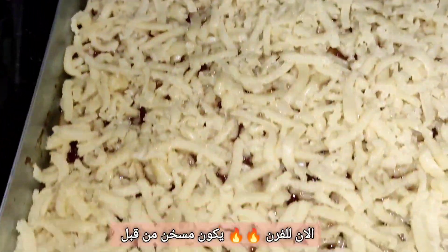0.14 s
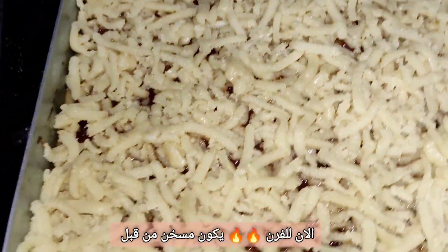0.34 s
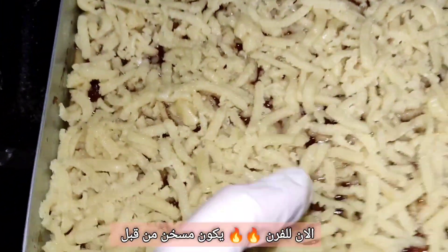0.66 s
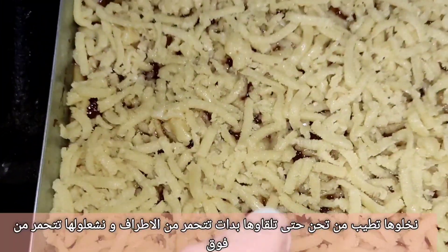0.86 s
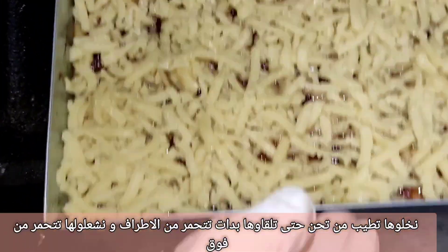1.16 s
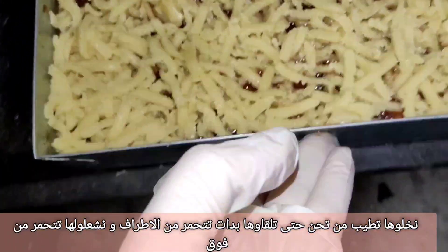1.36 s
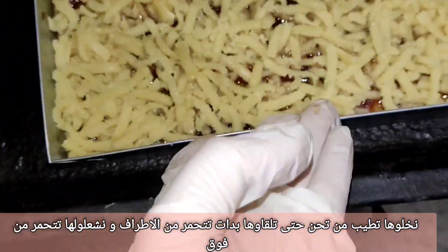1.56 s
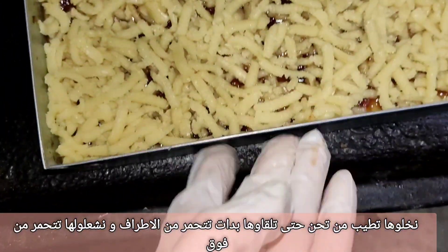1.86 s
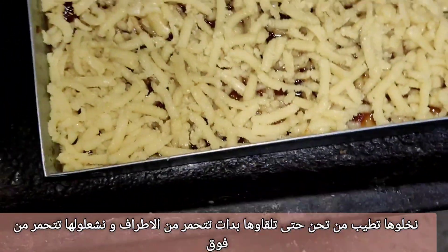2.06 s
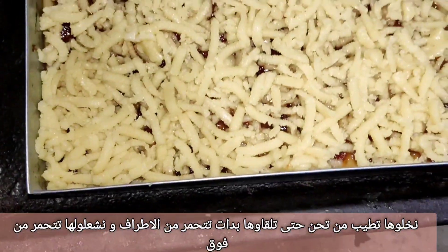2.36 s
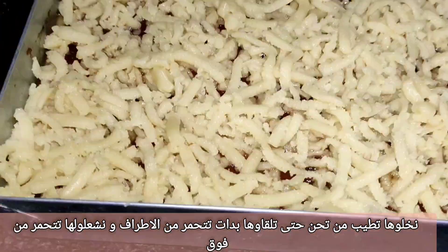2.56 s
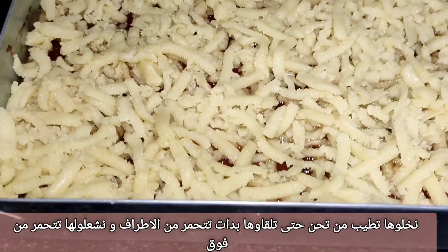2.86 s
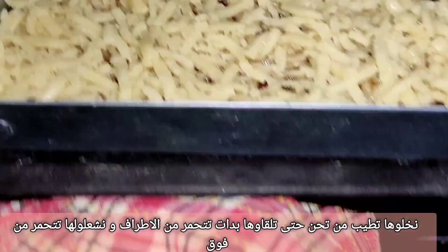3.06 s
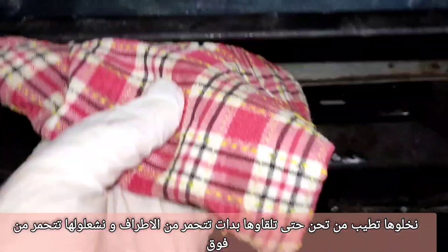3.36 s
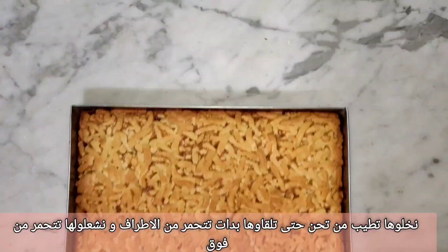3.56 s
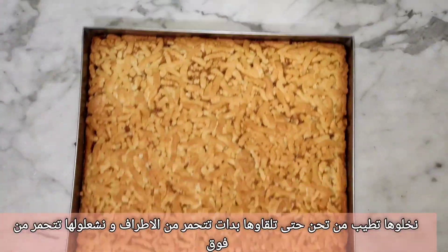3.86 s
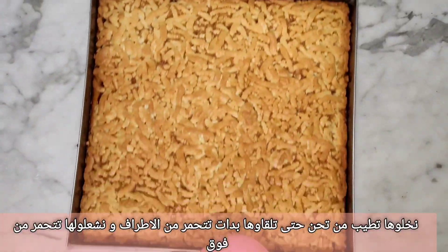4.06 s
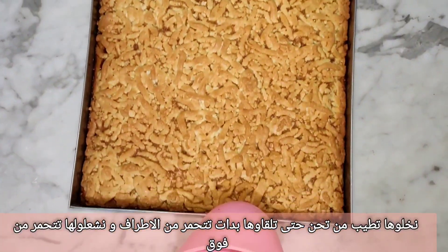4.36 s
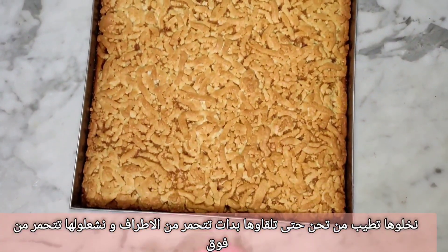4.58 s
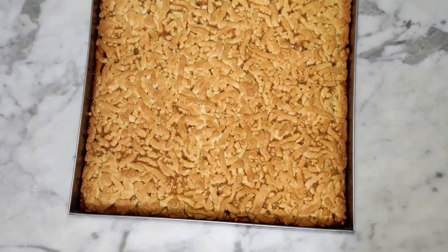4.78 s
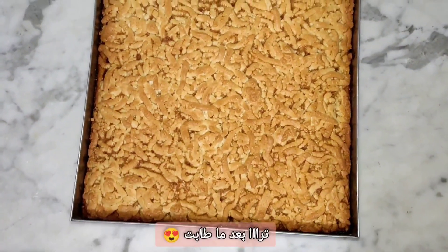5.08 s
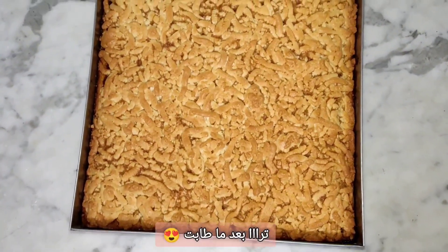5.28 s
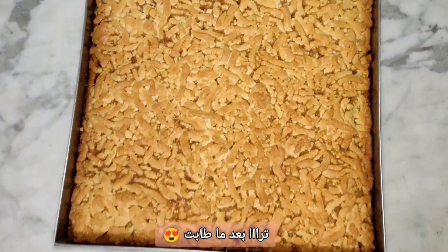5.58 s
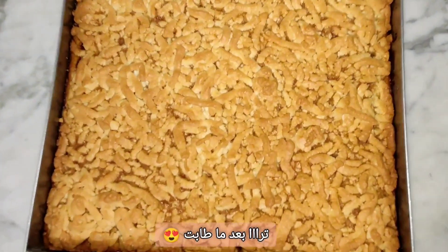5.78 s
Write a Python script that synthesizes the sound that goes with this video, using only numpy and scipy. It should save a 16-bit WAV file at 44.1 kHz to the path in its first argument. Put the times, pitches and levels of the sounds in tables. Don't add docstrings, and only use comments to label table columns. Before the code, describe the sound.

A faint low oven hum and airy noise open the scene. At about 0.27 s a metal baking tray starts grinding along the rack bars with short squeaky ringing and hollow oven resonance. It drops at 0.75-0.8 s with the loudest clanks, bouncing and rattling, then fades by 1.1 s. A second push from 1.13 s scrapes and sings around 700 Hz, with hard knocks near 1.5 s, dying by 1.8 s. Only hum and tiny ticks remain; at 2.58 s the sound drops out briefly and fades back. A light last slide from 2.9 s turns into sharp scrapes and knocks at 3.17-3.3 s. At 3.55 s it cuts to a quiet kitchen with soft mains buzz. The tray rubs gently over stone from 3.6 to 4.45 s, with small bumps near 3.97 s. Sparse clicks follow until 4.8 s, faint far chirps around 5 s, and a thin high whine swells slightly at the end.

```python
import sys
import numpy as np
from scipy import signal
from scipy.fft import rfft, irfft, next_fast_len
from scipy.io import wavfile
from scipy.ndimage import uniform_filter1d

SR = 44100
rng = np.random.default_rng(int(sys.argv[2]) if len(sys.argv) > 2 else 0)


def to_wav(sig):
    pcm = np.clip(np.atleast_2d(sig), -1, 1) * 32767
    pcm = np.round(pcm).astype(np.int16)
    wavfile.write(sys.argv[1], SR, pcm.T)


def convert_level_to_amplitude(level_db):
    exponent = np.asarray(level_db, float) / 20
    return 10 ** exponent


N = 261513
TO_COUNTER_S = 3.552


def evened(x):
    return x / np.sqrt(np.mean(x ** 2) + 1e-20)


def read(points, hz):
    f, value = np.transpose(points)
    return np.interp(np.log(hz + 1), np.log(f + 1), value)


def add(mix, s, sound):
    part = mix[round(s * SR):][:len(sound)]
    part += sound[:len(part)]


def wander(clock, smooth):
    knots = clock[::2000]
    return np.interp(clock, knots, evened(uniform_filter1d(rng.standard_normal(len(knots)), smooth)))


def resonate(x, hz, width):
    turn = np.exp(2j * np.pi * np.cumsum(hz * np.ones(len(x))) / SR)
    r = np.exp(-np.pi * width / SR)
    return 2 * (turn * signal.lfilter([1 - r], [1, -r], x / turn)).real


def split(x, edges_hz):
    lows = [signal.sosfilt(signal.butter(4, hz, fs=SR, output="sos"), x) for hz in edges_hz]
    highs = [signal.sosfilt(signal.butter(4, hz, "high", fs=SR, output="sos"), y)
             for hz, y in zip(edges_hz, lows[1:] + [x])]
    return lows[:1] + highs


def grit(per_s, spread_db, smooth):
    size = convert_level_to_amplitude(spread_db * np.minimum(rng.exponential(1, N), 4))
    slips = size * (rng.random(N) < per_s / SR) * rng.choice([-1., 1.], N)
    return evened(evened(slips) + smooth * rng.standard_normal(N))


def dense_rings(colour, t60s, count, size):
    hz, t, z = signal.stft(rng.standard_normal((count, size)), SR, nperseg=256)
    dying = z * convert_level_to_amplitude(-60 * t / read(t60s, hz)[:, None])
    z = rfft(signal.istft(dying, SR, nperseg=256)[1][:, :size])
    z /= np.sqrt(uniform_filter1d(abs(z) ** 2, size // 200))
    return evened(irfft(z * convert_level_to_amplitude(read(colour, np.fft.rfftfreq(size, 1 / SR)))))


def sliding(drive, rings, dwell_s):
    place, size = np.arange(N) / SR / dwell_s, next_fast_len(N + rings.shape[1])
    away = (place - np.arange(len(rings))[:, None]) % len(rings) - 1
    share = np.cos(np.pi / 2 * np.clip(away, -1, 1))
    rung = irfft((rfft(drive * share, size) * rfft(rings, size)).sum(0), size)[:N]
    return rung / np.linalg.norm(rings[0])


# frequency in Hz, likeness from 0 to 1.
AIR_SAME = [(60, 0.6), (130, 0.81), (290, 0.64), (630, 0.05), (1390, 0.065), (3050, 0.01), (6680, 0.01),
            (14600, 0.022)]


def air(colour, level_db, tones, waver_db, leaning):
    size = next_fast_len(N)
    hz, t = np.fft.rfftfreq(size, 1 / SR), np.arange(size) / SR
    a, b = rfft(rng.standard_normal((2, size)))
    like, right = np.clip(read(AIR_SAME, hz), -1, 1), convert_level_to_amplitude(-read(leaning, hz))
    z = np.array([a, right * (like * a + np.sqrt(1 - like ** 2) * b)])
    z *= convert_level_to_amplitude(read(colour, hz)) / np.sqrt(1 + right ** 2 + 2 * like * right)
    audible = irfft(z.mean(0) * (hz > 60), size)
    noise = irfft(z, size) / np.std(audible) * convert_level_to_amplitude(level_db)
    for f, db in tones:
        drift = wander(t, 4)
        phase = f * t + rng.random() + 0.044 * drift[::-1]
        tone = np.sqrt(2) * convert_level_to_amplitude(db + waver_db * drift) * np.sin(2 * np.pi * phase)
        lean = convert_level_to_amplitude(-read(leaning, f))
        noise += 2 * tone * np.array([[1], [lean]]) / (1 + lean)
    return noise[:, :N]


# frequency in Hz, level in dB per Hz.
OVEN_AIR = [(15, -35), (25, -10), (59, -9.5), (142, -16), (243, -17), (558, -23), (673, -27), (1350, -34),
            (2560, -37), (6370, -45), (10900, -35), (13800, -43), (15000, -60)]
# frequency in Hz, level in dB.
OVEN_HUM = [(48.4, -48.5), (75.4, -63), (247.6, -61.5), (371.4, -74), (689.1, -76.5)]
# frequency in Hz, left minus right in dB.
OVEN_LEAN = [(60, 0), (110, -2), (200, 0.5), (380, 2.5), (690, 4), (1270, 6.5), (2340, 10.5), (4320, 7),
             (7950, 12), (14600, 27)]


def oven_air():
    return air(OVEN_AIR, -54.5, OVEN_HUM, 1.2, OVEN_LEAN)


# frequency in Hz, level in dB, decay time T60 in seconds.
TRAY_MODES = [(106, -13.5, 0.78), (195.6, -2.5, 0.36), (606, -19.5, 1), (685.4, -27, 0.94),
              (810, -10.5, 0.3), (885, -4, 0.23), (1270, -15, 0.094), (1419, -25, 0.19),
              (1623, -18.5, 0.29), (2164, -24.5, 0.42), (2200, -30.5, 0.33), (2730, -24.5, 0.2),
              (2986, -31, 0.2), (3280, -30, 0.82)]
# frequency in Hz, level in dB, decay time T60 in seconds.
OVEN_MODES = [(75.4, -41.5, 0.89), (188, -0.5, 0.15), (228.85, 3.5, 1), (366, -15, 0.74),
              (539, -16.5, 0.48), (721, -34.5, 0.48), (785, -40, 0.32), (940, -24.5, 0.28)]
# frequency in Hz, level in dB per Hz.
METAL = [(29, -50.5), (50, -5.5), (133, -17), (181, 3), (299, -17.5), (483, -11), (570, -17), (674, -12.5),
         (876, -19), (1630, -19), (2690, -13.5), (6060, -27.5), (10500, -16), (14000, -24.5), (15000, -65)]
# frequency in Hz, decay time T60 in seconds.
METAL_T60 = [(60, 0.31), (300, 0.25), (1000, 0.05), (3000, 0.11), (8000, 0.052), (14000, 0.017)]


def metal_rings():
    t = np.arange(8192) / SR
    dense = dense_rings(METAL, METAL_T60, count=4, size=len(t))
    tray_modes, oven_modes = [
        evened(sum(convert_level_to_amplitude(db - 60 * t / t60) * np.sin(2 * np.pi * hz * t) for hz, db, t60 in modes))
        for modes in (TRAY_MODES, OVEN_MODES)]
    return dense, tray_modes, oven_modes


EDGES_HZ = [300, 1100, 6000]
# time in seconds, weight on the bars in dB, sliding speed in dB, pitch of the free sheet in Hz.
FIRST_PUSH = [
    (0.266, -31, -49.5, 947),
    (0.375, -31.5, -50, 964),
    (0.385, -31.5, -56.5, 790),
    (0.534, -33.5, -41.5, 736),
    (0.684, -37.5, -51.5, 770),
    (0.7, -44.5, -40.5, 750),
    (0.74, -36, -57, 755),
]
SET_DOWN = [
    (0.743, -22.5, -37.5, 735),
    (0.762, -20, -39.5, 744),
    (0.775, -19, -34.5, 740),
    (0.839, -27.5, -51.5, 717),
    (1.039, -48.5, -76.5, 734),
    (1.12, -49, -54.5, 745),
]
SECOND_PUSH = [
    (1.13, -42, -54, 750),
    (1.154, -33.5, -46.5, 760),
    (1.288, -27.5, -36.5, 657),
    (1.458, -27, -40, 721),
    (1.51, -20, -31.5, 728),
    (1.562, -32.5, -46, 774),
    (1.708, -48.5, -68.5, 665),
    (1.806, -60.5, -62, 740),
    (1.9, -51.5, -70, 650),
]
LAST_PUSH = [
    (2.8, -80, -70, 701),
    (2.914, -55.5, -42.5, 774),
    (3.164, -55.5, -34, 731),
    (3.174, -42, -33, 728),
    (3.222, -40, -37.5, 755),
    (3.26, -34, -27, 768),
    (3.304, -41.5, -34.5, 690),
    (3.518, -56, -37.5, 753),
    (3.55, -34.5, -37, 771),
]
# oven boom in dB, share of the singing sheet, rack clatter in dB.
COUPLING = [
    (-4.5, 0.29, 1),
    (-6.5, 0.62, -4),
    (-13.5, 0.75, 0.37),
    (-3.5, 0.32, -0.2),
]
FROM_WEIGHT_DB = [-2, 0, -9.5, -37.5]
FROM_SPEED_DB = [-2.5, -22, -7.5, -0.5]
WEIGHT_POWER = [0.76, 0.96, 1.175, 1.3]
RELEASE_DB_PER_S = [110, 300, 400, 600]


def sliding_tray(dense, tray_modes, oven_modes):
    clock = np.arange(N) / SR
    pushes = [FIRST_PUSH, SET_DOWN, SECOND_PUSH, LAST_PUSH]
    s, weight_db, speed_db, ring_hz = np.concatenate(pushes).T
    push_now = np.searchsorted([push[0][0] for push in pushes[1:]], clock)
    boom_db, sing, rack_db = np.transpose(COUPLING)[:, push_now]
    moving = (clock < SECOND_PUSH[-1][0]) & (clock > s[0]) | (clock > LAST_PUSH[0][0])
    rings = dense + 0.15 * tray_modes + 0.21 * oven_modes
    boom, ring, clatter, hiss = split(sliding(grit(4000, 3.8, 0.88), rings, .07), EDGES_HZ)

    low_mode = evened(resonate(boom, 200 + 5 * wander(clock, 3), 30))
    boom = evened(evened(boom) + 0.86 * low_mode) * convert_level_to_amplitude(boom_db)
    sheet_hz = np.interp(clock, s, ring_hz)
    judder = resonate(grit(220, 0.6, 0.49), sheet_hz, 270)
    sing = sing * np.clip((np.interp(clock, s, speed_db) + 76.5) / 24, 0, 1)
    ring = (evened(ring) + sing * evened(resonate(judder, sheet_hz, 45))) / np.hypot(1, sing)
    bands = [boom, ring, convert_level_to_amplitude(rack_db) * evened(clatter), evened(hiss)]

    weight, speed = [moving * convert_level_to_amplitude(np.minimum(np.interp(clock, s, db), np.interp(clock - .014, s, db)))
                     for db in (weight_db, speed_db)]
    usual_weight_db = -32.5
    out = np.zeros(N)
    for band, heavy_db, power, quick_db, release in zip(
            bands, FROM_WEIGHT_DB, WEIGHT_POWER, FROM_SPEED_DB, RELEASE_DB_PER_S):
        from_weight = convert_level_to_amplitude(heavy_db + (1 - power) * usual_weight_db) * weight ** power
        force = np.hypot(from_weight, convert_level_to_amplitude(quick_db) * speed)
        db = np.maximum.accumulate(20 * np.log10(force + 1e-9) + release * clock) - release * clock
        out += convert_level_to_amplitude(db) * band
    return out


# time in seconds, peak in dB, depth in dB, brightness in dB.
KNOCKS = [(.349, -23, -20, -0.5), (.702, -38, 11, 19), (.747, -13.5, -15, -1.5), (.7735, -9.5, -9, -3.5),
          (.781, -23.5, 6.5, -4), (.79, -28, 2, -8), (.803, -25.5, -7, 2.5), (.876, -28, 2.5, -10.5),
          (1.155, -42, 6, 20), (1.234, -24, -10.5, -0.5), (1.31, -42, 5, 13), (1.476, -16, -4.5, 1),
          (1.501, -17, 2.5, 0.5), (1.513, -23, 3, 8.5), (3.017, -66, 0, 24), (3.175, -25.5, -9, 3),
          (3.261, -26, -8, -3)]


def knocks(dense, tray_modes, oven_modes):
    t = np.arange(8192) / SR
    struck = split(dense + 0.12 * tray_modes + .5 * oven_modes, EDGES_HZ)
    decay = convert_level_to_amplitude(-60 * t / 0.35) + 0.38 * convert_level_to_amplitude(-60 * t / 0.067)
    out = np.zeros(N)
    for k, (s, peak_db, depth_db, bright_db) in enumerate(KNOCKS):
        blow = rng.standard_normal(220) * convert_level_to_amplitude(-60 * t[:220] / 0.012)
        band_db = [depth_db, 0, -5 + 0.51 * bright_db, -13 + bright_db]
        for db, part in zip(band_db, struck):
            ring = signal.fftconvolve(part[k % len(part)] * decay, blow)
            add(out, s, convert_level_to_amplitude(peak_db + db) * ring / abs(ring).max())
    return out


def tray():
    rings = metal_rings()
    return split(sliding_tray(*rings) + knocks(*rings), [80])[1]


def kitchen_tails():
    tails = dense_rings([(100, 8), (15000, -4.0)], [(200, 0.22), (3000, 0.32), (12000, 0.1)], count=6, size=8192)
    return tails / np.linalg.norm(tails[0])


# time in seconds, ring peak in dB, ring pitch in Hz, snap peak in dB.
BANGS = [
    (.7722, -7, 740, -24),
    (.7763, -9, 740, -28),
    (.786, -13, 700, -33),
    (1.143, -28, 750, -58),
    (1.512, -14, 770, -34),
    (3.962, -32, 1150, -52),
    (3.977, -31, 1100, -54),
]
TAPS = [(.2776, -28, 970, -48), (.7491, -27, 123, -73), (.7831, -28, 105, -71), (.7476, -14, 710, -28),
        (.7861, -21, 330, -40), (1.5001, -27, 110, -71), (3.1741, -32, 750, -52), (3.2601, -25, 950, -46),
        (3.2641, -29, 1300, -60), (3.2841, -31, 1100, -60), (4.4581, -35, 272, -59),
        (3.6981, -43, 825, -62), (3.7171, -42, 830, -65), (3.7351, -44, 830, -66), (3.8741, -40, 980, -60),
        (3.9121, -43, 1000, -63), (.7486, -22, 1500, -40)]
PINGS = [
    (1.5301, -27, 188, -58),
    (3.9321, -42, 3120, -58),
    (3.9631, -39, 3150, -70),
    (3.9761, -39, 3060, -70),
    (3.9901, -43, 3050, -70),
    (4.4901, -49, 280, -80),
    (4.7761, -46, 1184, -50),
    (4.4591, -41.5, 436, -71),
    (4.8211, -49, 2120, -37),
    (4.8221, -51, 1170, -65),
]
PANEL_RINGS = [
    (1.525, -31.5, 366, -60.5),
    (1.531, -31.5, 230.1, -61),
]
CRUMBS = [(.2656, -28, 2600, -47), (1.8131, -34, 10600, -68), (1.9021, -46, 3000, -39),
          (2.4051, -43, 2920, -48), (.7031, -32, 9000, -40), (.7479, -23, 3000, -32),
          (.7491, -28, 5300, -41), (.7736, -19, 1500, -40), (.7781, -21, 1900, -40),
          (.7621, -25, 1400, -45), (.7871, -23, 1600, -45), (4.8222, -48, 1500, -70),
          (2.4801, -57, 4040, -55), (2.5551, -47, 2960, -47), (2.5751, -44, 3240, -42),
          (4.2201, -46, 1200, -54), (4.4592, -39, 680, -70), (4.5741, -58, 5000, -47),
          (4.6263, -44, 4200, -61), (4.6271, -38, 1600, -37), (4.6273, -35, 2100, -60),
          (4.6276, -37, 2700, -53)]
# sharpness in Hz per Hz of width, room tail in dB.
BANG_KIND = (8, -12)
TAP_KIND = (4.6, -6)
PING_KIND = (11, -6)
PANEL_KIND = (73, -20)
CRUMB_KIND = (2.6, -5)


def small_sounds():
    out, tails = np.zeros(N), kitchen_tails()
    kinds = [(BANGS, BANG_KIND), (TAPS, TAP_KIND), (PINGS, PING_KIND),
             (PANEL_RINGS, PANEL_KIND), (CRUMBS, CRUMB_KIND)]
    ticks = [(*row, *kind) for rows, kind in kinds for row in rows]
    for k, (s, ring_db, hz, snap_db, sharp, tail_db) in enumerate(ticks):
        width = hz / sharp
        t = np.arange(0, .04 + 2.5 / width, 1 / SR)
        tap = (t == 0) + 0.51 * rng.standard_normal(len(t)) * convert_level_to_amplitude(-60 * t / 0.014)
        ring = resonate(resonate(tap, hz, 2 * width), hz, width)
        snap = split(tap, [3500, 11000])[1]
        tick = convert_level_to_amplitude(ring_db) * ring / abs(ring).max() + convert_level_to_amplitude(snap_db) * snap / abs(snap).max()
        add(out, s, tick)
        add(out, s + 0.0033, convert_level_to_amplitude(tail_db) * signal.fftconvolve(tick, tails[k % len(tails)]))
    return out


# start in seconds, length in seconds, pitch in Hz,
# peak in dB.
SONGS = [(.27, .022, 975, -30), (0.307, 0.1, 970, -35), (0.347, 0.036, 785, -32),
         (0.366, 0.078, 423.5, -33.5), (0.379, 0.12, 227.6, -29), (0.406, 0.068, 637, -32),
         (0.506, 0.063, 766, -37), (0.541, 0.035, 228, -31), (0.579, .07, 756, -43),
         (0.642, 0.042, 766, -33), (.85, 0.089, 189.5, -26), (0.861, .07, 790, -27.5), (.93, .17, 835, -45),
         (1.031, 0.17, 193.4, -44.5), (1.136, 0.069, 750, -34), (1.185, 0.04, 790, -31.5),
         (1.192, 0.038, 127, -30), (1.23, 0.053, 674, -22.5), (1.294, .05, 681.5, -23),
         (1.29, 0.12, 229.6, -34.5), (1.33, 0.031, 498, -32), (1.363, 0.1, 688, -31.5),
         (1.485, 0.044, 980, -25.5), (3.178, 0.036, 178, -20), (3.226, 0.028, 179, -26.5),
         (3.26, .024, 197, -14.5), (1.5, .03, 774, -20.5), (.749, 0.011, 655, -15), (0.797, .045, 760, -23),
         (3.288, 0.027, 200, -27.5), (3.333, 0.04, 205, -28.5)]


def songs():
    out = np.zeros(N)
    for s, length, hz, db in SONGS:
        t = np.arange(0, length, 1 / SR)
        flutter, wobble = evened(uniform_filter1d(rng.standard_normal((2, 8192)), 900))[:, :len(t)]
        swell = np.sqrt(abs(np.sin(np.pi * (t / length) ** .8))) * convert_level_to_amplitude(db + 2 * flutter)
        add(out, s, swell * np.sin(2 * np.pi * (hz * t + .05 * wobble)))
    return out


# time in seconds, level in dB, rise in dB per second.
BOX = [
    (.408, -31.5, 200),
    (.785, -27, 701),
    (1.202, -34.5, 500),
    (1.45, -30.5, 500),
    (1.508, -35.5, 402),
    (3.29, -36, 294.5),
]


def oven_box():
    clock = np.arange(N) / SR
    hz, width_hz, fall_db_per_s = 102.4, 8.4, 114.5
    drum = resonate(resonate(rng.standard_normal(N), hz, width_hz), hz, 2 * width_hz)
    shake = sum(convert_level_to_amplitude(db + np.minimum(rise * (clock - s), fall_db_per_s * (s - clock))) for s, db, rise in BOX)
    return shake * evened(drum)


# frequency in Hz, level in dB per Hz.
KITCHEN_AIR = [(15, -33), (25, 8.5), (64, -9), (86, -7), (150, -10), (219, -20), (404, -14.5), (856, -23.5),
               (1860, -26.5), (3350, -33), (9270, -31.5), (13800, -41.5), (15000, -27)]
# frequency in Hz, level in dB.
MAINS = [(102.3, -63), (150.7, -63.5), (247.6, -70), (301.5, -70.5), (344.5, -80), (398.4, -67),
         (446.8, -77), (500.6, -74.5), (543.7, -69), (2073, -82)]
# frequency in Hz, left minus right in dB.
AIR_LEAN = [(60, 1), (110, 0.67), (200, 1.5), (380, 1.3), (690, 2.8), (1270, 6.8), (2340, 9.5), (4320, 7.6),
            (7950, 15.5), (14600, 1.6)]


def kitchen_air():
    return air(KITCHEN_AIR, -57.5, MAINS, 2.9, AIR_LEAN)


# time in seconds, pressure in dB, rub resonance in Hz.
DRAG = [
    (3.6, -57, 985),
    (3.618, -62, 935),
    (3.7, -57.5, 855),
    (3.828, -49, 1000),
    (3.958, -53.5, 1010),
    (3.964, -50.5, 1100),
    (4.146, -53.5, 915),
    (4.214, -56.5, 1180),
    (4.45, -65.5, 1000),
]
# frequency in Hz, level in dB per Hz.
STONE = [(150, -42), (250, -11), (433, 0), (471, -6.5), (675, -3), (1020, -7.5), (2530, -17), (3100, -15),
         (4840, -32.5), (5370, -30), (6400, -29.5), (8200, -25.5), (12600, -43.5), (14200, -39),
         (15000, -55)]
RUB_DB = [1.5, -1, -6]
RUB_FADE_DB_PER_S = [-15, -2, 4]


def counter():
    s, pressure_db, hz = np.transpose(DRAG)
    clock = np.arange(N) / SR
    rings = dense_rings(STONE, [(200, 0.13), (14000, 0.054)], count=5, size=4096)
    low, *rest = split(sliding(grit(1500, 4.9, 1.5), rings, .05), [1400, 4500])
    low = evened(low) + 0.68 * evened(resonate(low, np.interp(clock, s, hz), 140))
    layers = sum(convert_level_to_amplitude(db + fade * (clock - s[0])) * evened(x)
                 for db, fade, x in zip(RUB_DB, RUB_FADE_DB_PER_S, [low] + rest))
    return convert_level_to_amplitude(np.interp(clock, s, pressure_db, -200, -200)) * layers


# frequency in Hz, width in Hz, level in dB.
WHINE = [(9130, 45, 2.5), (9450, 51, -1), (9450, 55, -2)]
# time in seconds, level in dB.
WHINE_LEVEL = [
    (3.7, -79),
    (4.7, -76.5),
    (4.9, -79),
    (5.4, -80.5),
    (5.93, -71.5),
]


def whine():
    lines = sum(convert_level_to_amplitude(db) * evened(resonate(rng.standard_normal(N), hz, width)) for hz, width, db in WHINE)
    return convert_level_to_amplitude(np.interp(np.arange(N) / SR, *np.transpose(WHINE_LEVEL), -200)) * lines


# start in seconds, length in seconds, start pitch in Hz, end pitch in Hz, level in dB.
CHIRPS = [
    (3.75, 0.079, 5660, 5200, -57),
    (4.407, 0.085, 3330, 3280, -68),
    (4.945, 0.033, 5150, 5300, -61),
    (5.0, .08, 5350, 5260, -74),
    (4.957, .11, 3990, 3870, -61.5),
    (5.024, 0.08, 3500, 3400, -69),
]


def far_birds():
    out = np.zeros(N)
    for (s, length, hz0, hz1, db), tail in zip(CHIRPS, kitchen_tails()):
        hz = np.linspace(hz0, hz1, int(length * SR))
        trill = evened(resonate(resonate(rng.standard_normal(len(hz)), hz, 560), hz, 560))
        add(out, s, signal.fftconvolve(convert_level_to_amplitude(db) * trill * signal.windows.tukey(len(hz), .5), tail))
    return out


# frequency in Hz, left minus right in dB.
NEAR_LEAN = [(60, -1), (110, 0.5), (200, -2.5), (380, 3), (690, 1.5), (1270, 6.5), (2340, 12.5),
             (4320, 19.5), (7950, 27), (14600, 61)]
# frequency in Hz, likeness from -1 to 1.
NEAR_SAME = [(60, 0.93), (130, 0.94), (290, 0.86), (630, 1), (1390, -0.27), (3050, 0.063), (6680, 1),
             (14600, 0.096)]


def ports(x):
    hz, t, z = signal.stft(x, SR, nperseg=512, noverlap=384)
    paths = rng.standard_normal((len(t), len(hz), 2))
    a, b = uniform_filter1d(uniform_filter1d(paths, 10, 0), 2, 1).T
    other = (a + 1j * b) / abs(a + 1j * b)
    like = np.clip(read(NEAR_SAME, hz), -1, 1)[:, None]
    right = convert_level_to_amplitude(-read(NEAR_LEAN, hz))[:, None]
    left = 2 * z / np.sqrt(1 + right ** 2 + 2 * like * right)
    lag = np.exp(-2j * np.pi * hz * 9 / SR)[:, None]
    covered = left * right * (like * lag + 1.1 * np.sqrt(1 - like ** 2) * other)
    return signal.istft(np.array([left, covered]), SR, nperseg=512, noverlap=384)[1][:, :N]


def scene():
    at_oven = np.arange(N) < TO_COUNTER_S * SR
    oven = oven_air()
    near = tray() * at_oven + small_sounds() + songs() + oven_box()
    kitchen = kitchen_air()
    near = near + counter() + whine() + far_birds()
    return ports(near) + np.where(at_oven, oven, kitchen)


# time in seconds, silence in seconds, fade-in in seconds.
CUTS = [
    (2.578, 0.0153, 0.26),
    (3.551, 0.0064, 0.12),
]


def scene_changes(x):
    t = np.arange(N) / SR
    bass = signal.sosfiltfilt(signal.butter(2, 120, fs=SR, output="sos"), x)
    treble, offset = x - bass, np.zeros(N)
    floor = convert_level_to_amplitude(-48)
    for s, silence, fade in CUTS:
        treble = treble * np.where(t < s, 1, np.clip((t - s - silence) / fade, floor, 1))
        bass = bass * np.where(t < s, 1, np.clip((t - s - 0.094) / 0.089, floor, 1))
        u = np.maximum(t - s - .09, 0) / .14
        offset += .011 * u * np.exp((1 - u ** 2) / 2)
    return treble + bass + offset


def top_cut(x):
    return signal.sosfilt(signal.butter(12, 15250, fs=SR, output="sos"), x)


def record(dry):
    sway = signal.sosfilt(signal.butter(2, [2.5, 18], "band", fs=SR, output="sos"), rng.standard_normal((2, N)))
    x = scene_changes(dry + convert_level_to_amplitude(-60.0) * evened(sway))
    band_limit = signal.firwin(511, 14400, window=("kaiser", 9), fs=SR)
    x = signal.oaconvolve(x, band_limit[None], "same")
    mix = .95 * np.tanh(x / .95)
    return top_cut(mix)


dry = scene()
out = record(dry)
to_wav(out)
```